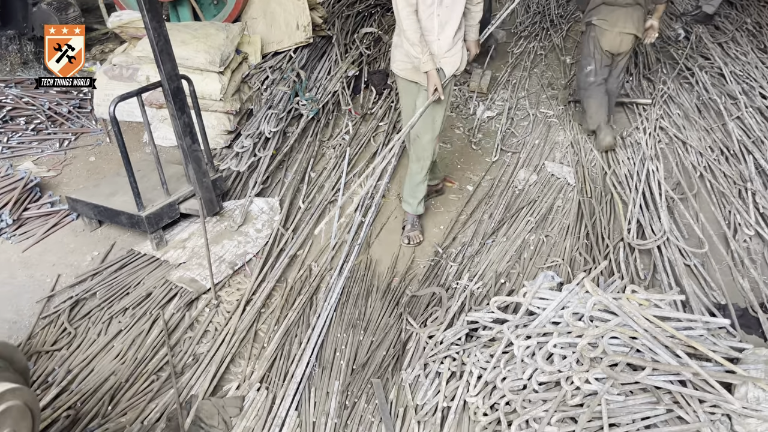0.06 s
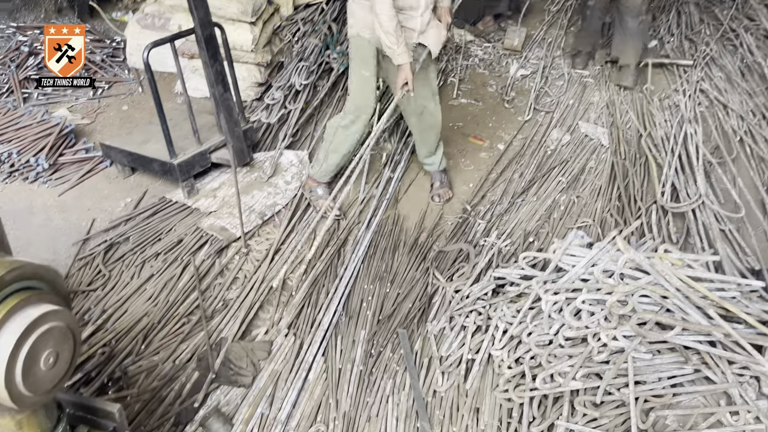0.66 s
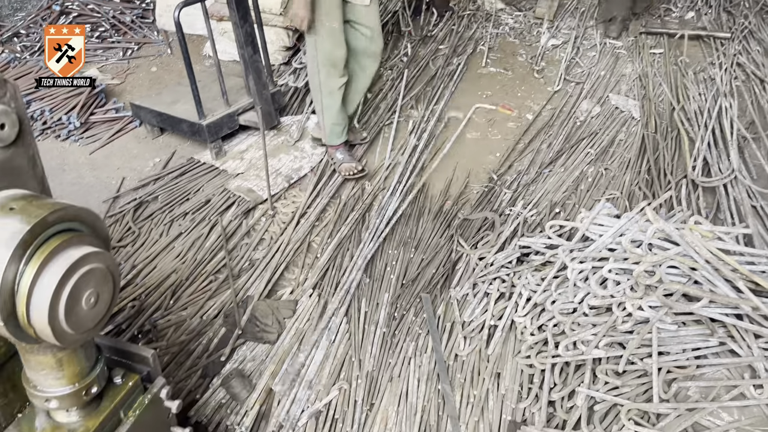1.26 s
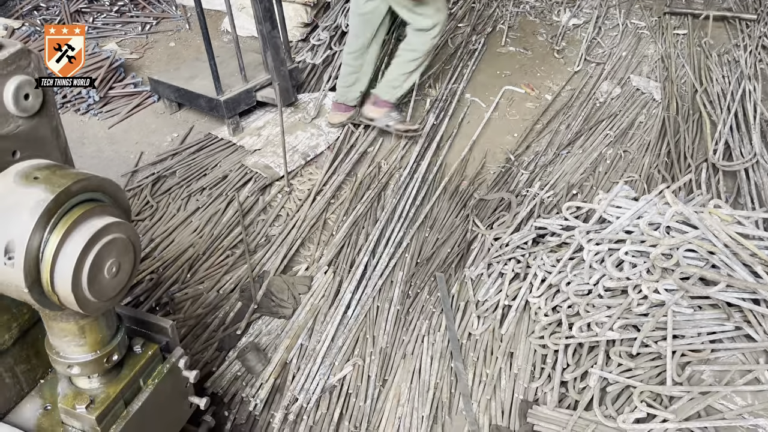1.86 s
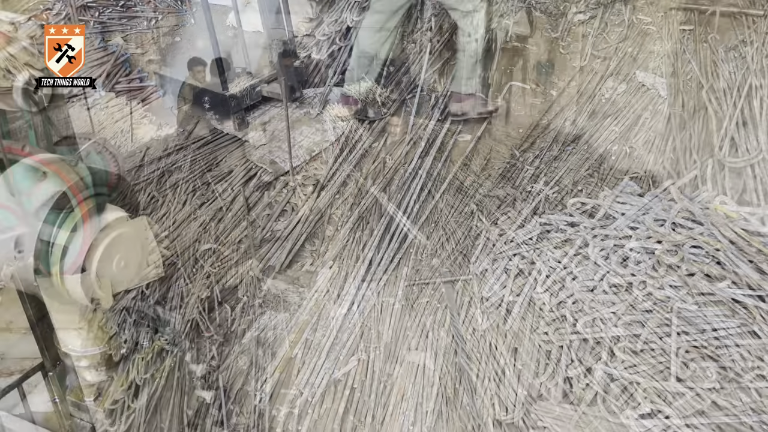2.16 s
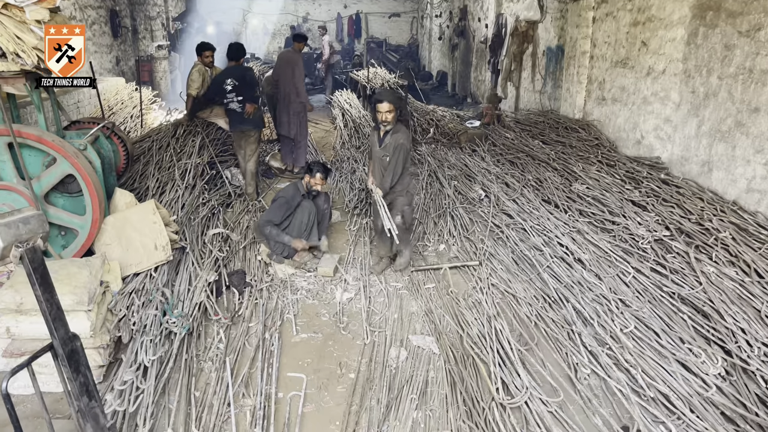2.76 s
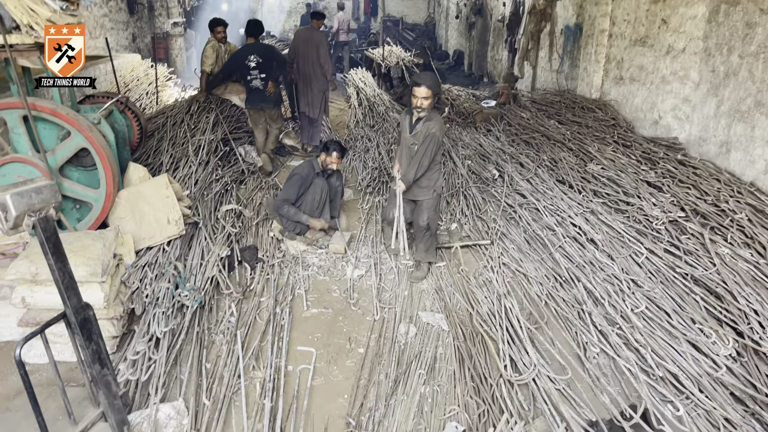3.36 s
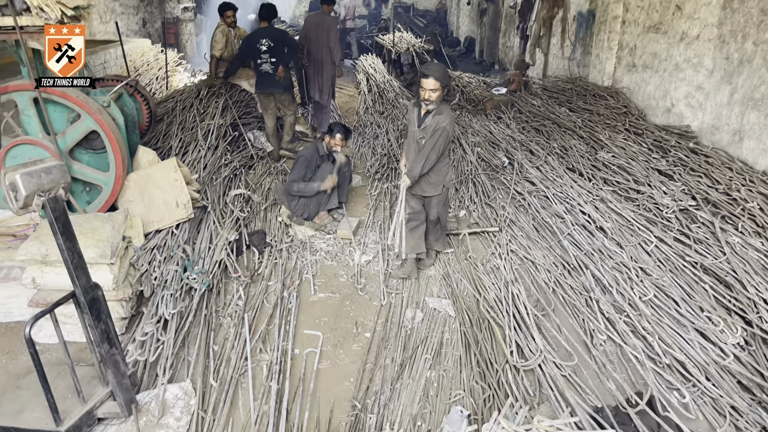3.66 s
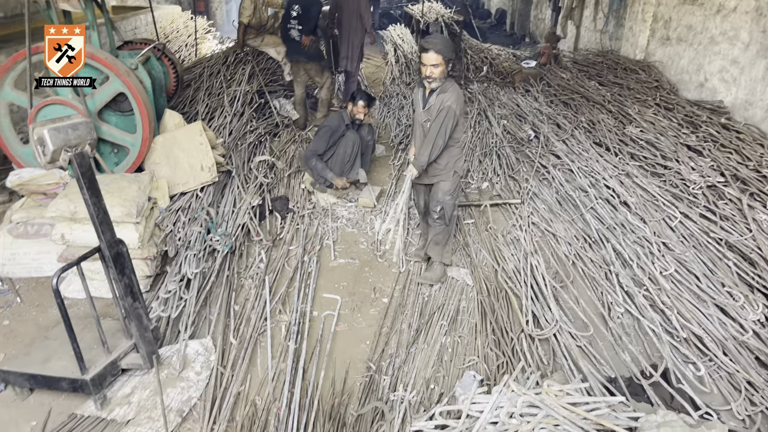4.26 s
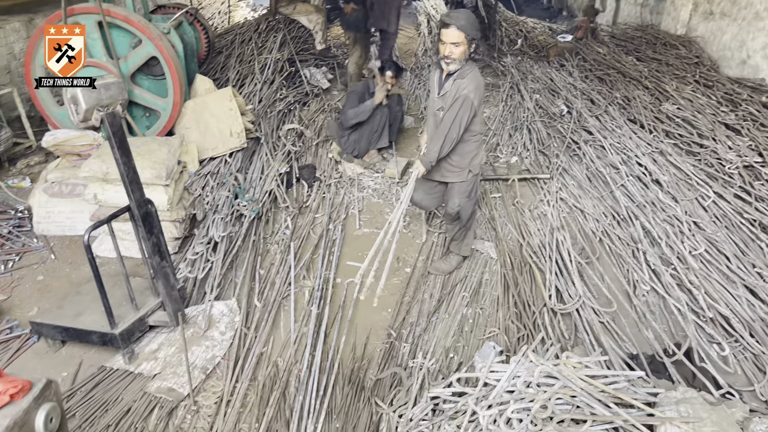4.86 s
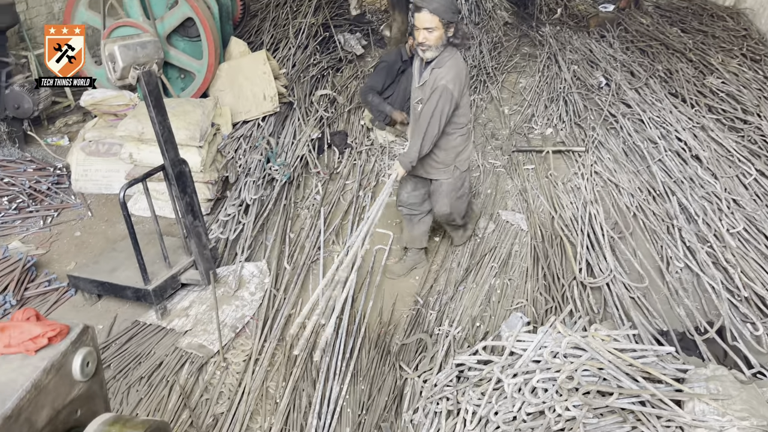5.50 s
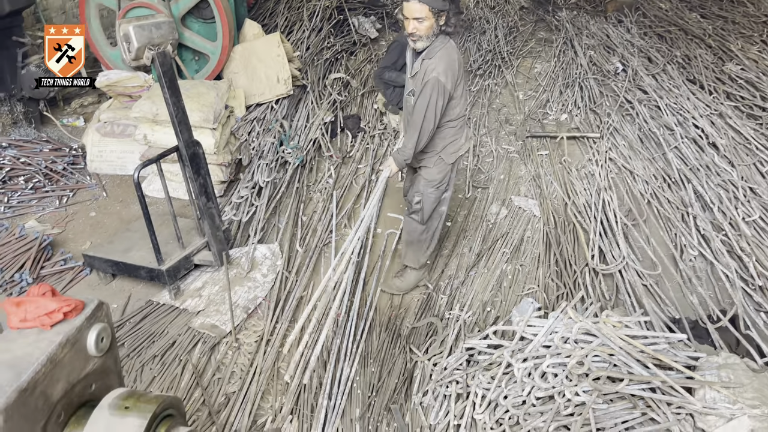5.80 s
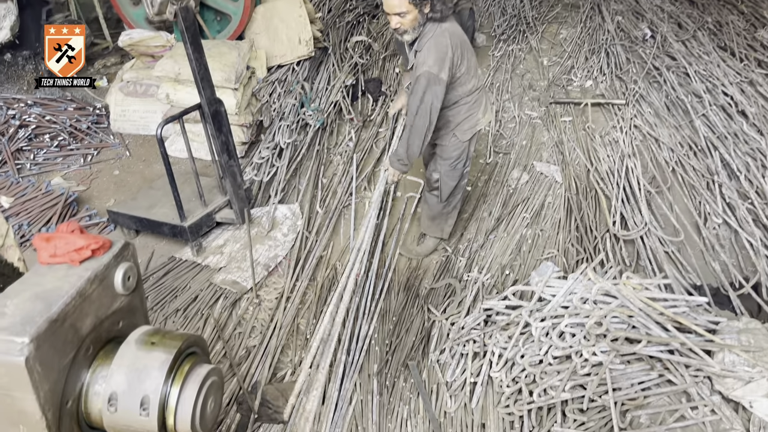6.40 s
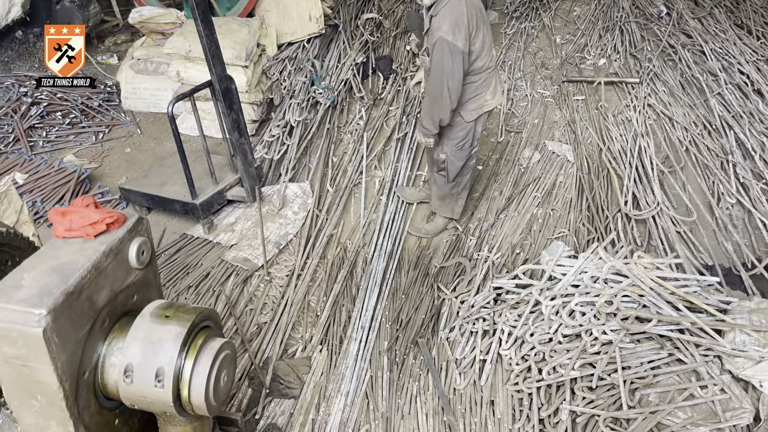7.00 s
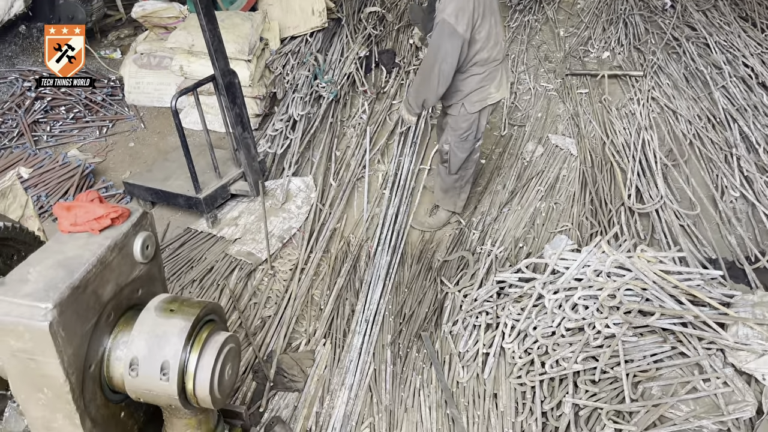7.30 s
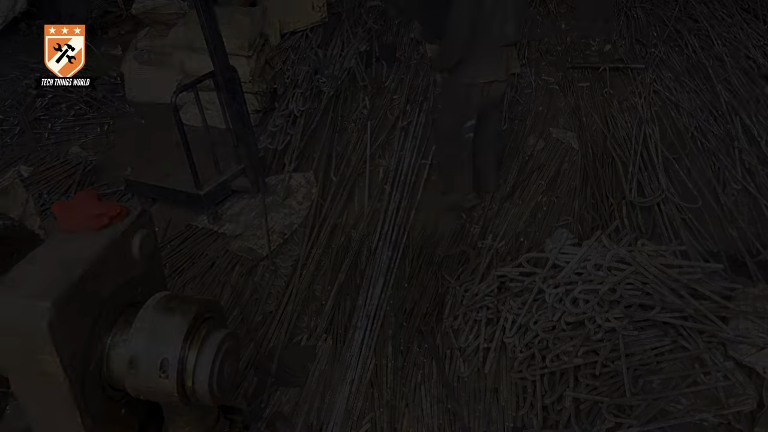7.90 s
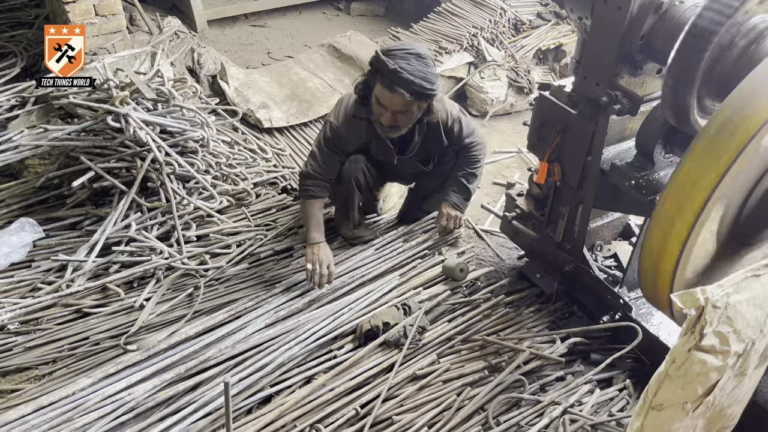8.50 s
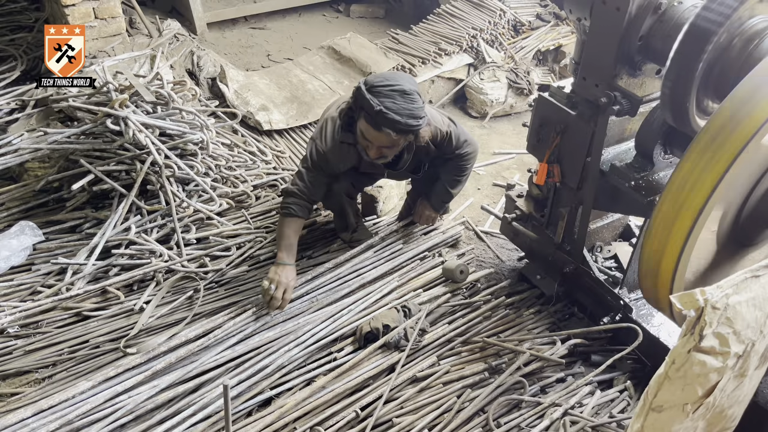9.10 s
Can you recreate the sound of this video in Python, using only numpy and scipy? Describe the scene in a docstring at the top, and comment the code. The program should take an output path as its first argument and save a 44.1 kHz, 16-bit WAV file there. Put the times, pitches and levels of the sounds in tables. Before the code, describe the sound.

Ribbed steel rods are dragged over a heap of bars, fairly close, in a hard-walled workshop with short reverberation. Each pull swells into dense metallic chatter and a bright rasp, then slides to rest. After an opening scrape, pulls peak at about 1, 1.9, 2.5, 3.7, 4.7, 5.7, 6.6 and 7.7 seconds, kicking loose bars into brief ringing clanks. Bars knock down on the pile throughout, and irregular footfalls add dull, hollow thumps. Bar ends clink brightly around 0.4, 1.3, 4.2, 5.3 and 6.1 seconds. Skidding tips give thin hisses, the clearest at 6.7 seconds. The sound cuts out for a tiny instant at 2.2 and 8 seconds. From 8 seconds a shorter, more resonant bundle is handled with quick knocks and clinks, ending in a loud clatter near 9 seconds. A quiet machine rumble and wavering low hum continue behind everything.

```python
"""Ribbed steel rods chatter and scrape as they are hauled hand over hand out of a workshop heap,
about one pull a second, kicking loose bars into clanks. A machine hums further back.
Bars knock down on the heap, their ends clink, feet make the pile ring hollow and tips skid with a hiss.
A shorter, more resonant bundle is handled last. Hard walls add a short reverberation;
twice the sound drops out for an instant."""
import sys
import numpy as np
from scipy import signal
from scipy.fft import rfft, irfft, next_fast_len
from scipy.io import wavfile

SR = 44100
rng = np.random.default_rng(int(sys.argv[2]) if len(sys.argv) > 2 else 0)


def store_wav(level_fs):
    """Save 16-bit WAV to argv[1]."""
    pcm = np.round(np.clip(np.atleast_2d(level_fs), -1, 1) * 32767)
    wavfile.write(sys.argv[1], SR, pcm.T.astype(np.int16))


N = 407925
T = np.arange(N) / SR


def undb(db):
    """Decibels to gain."""
    return 10 ** (np.asarray(db) / 20)


def unit(x):
    """Scale to rms 1."""
    return x / np.sqrt(np.mean(x ** 2))


def strike(x):
    """Scale a blow so that its first 20 ms have rms 1."""
    return x / np.sqrt(np.mean(x[:SR // 50] ** 2))


def unit_energy(x):
    """Scale a response so that it passes the power of white noise unchanged."""
    return x / np.sqrt(np.sum(x ** 2))


def onset(rise_s):
    """Attack envelope: contact builds up over a moment as more bars touch."""
    return 1 - np.exp(-T[:SR] / rise_s)


def fade(t60):
    """One second of exponential decay, falling 60 dB in t60 seconds."""
    return np.exp(-np.log(1000) * T[:SR] / t60)


def burst(t60):
    """Decaying noise: modes too dense to tell apart."""
    return rng.standard_normal(SR) * fade(t60)


def ring(hz, t60):
    """One decaying mode with a random phase."""
    return np.sin(2 * np.pi * (hz * T[:SR] + rng.random())) * fade(t60)


def colour(x, curve):
    """Equalise by a curve of (freq_hz, gain_db) points."""
    hz, db = np.transpose(curve)
    size = next_fast_len(x.shape[-1] + 4096, real=True)
    bins_hz = np.maximum(np.arange(size // 2 + 1) * SR / size, 1)
    gain = undb(np.interp(np.log(bins_hz), np.log(hz), db))
    return irfft(rfft(x, size) * gain, size)[..., :x.shape[-1]]


def tint(x, curve):
    """Colour a sound and keep its power."""
    return unit(colour(x, curve)) * np.sqrt(np.mean(x ** 2))


def drift(per_s):
    """Random modulation gliding between values of spread 1."""
    return np.interp(T * per_s, np.arange(4096), rng.standard_normal(4096))


def add(track, start_s, sound):
    """Mix a sound in at start_s."""
    start = max(int(start_s * SR), 0)
    track[start:start + len(sound)] += sound[:N - start]


def pull(grip_s, full_s, tug_s, hold_s, run_out_s, tug_db, gather_db_per_s):
    """Envelope of one pull: the bars gather speed, surge in a tug, hold and slide to rest."""
    slip_s, stop_s = 0.061, 0.065  # how fast the bars start sliding, and a tug dies as the arm stops
    before = np.minimum(T - full_s, 0)
    after = np.maximum(T - full_s - hold_s, 0)
    slide_db = gather_db_per_s * before - 60 * after / run_out_s
    surge_db = tug_db * (np.exp(-(before / tug_s) ** 2 - (after / stop_s) ** 2) - 1)
    return undb(slide_db + surge_db) * np.clip((T - grip_s) / slip_s, 0, 1)


# Pulls on the rods: grip_s, full_speed_at_s, tug_s, hold_s, chatter_db, scrape_db, scrape_t60_s
ROD_PULLS = [(-0.2, 0.0, 0.09, 0.0085, -24, -28, 0.96), (0.506, 0.967, 0.11, 0.048, -22, -24.5, 1.5),
             (1.4, 1.933, 0.16, 0.08, -21.5, -23.5, 1.0), (2.314, 2.523, 0.07, 0.034, -18.5, -22, 0.65),
             (3.29, 3.679, 0.088, 0.021, -20, -22.5, 0.9), (4.365, 4.66, 0.055, 0.026, -18.5, -20, 0.69),
             (5.247, 5.664, 0.18, 0.089, -21, -24, 1.14), (6.286, 6.586, 0.097, 0.043, -22, -24.5, .88),
             (7.537, 7.69, 0.059, 0.053, -20, -23, 0.8), (8.012, 8.2, 0.13, 0.02, -28, -36.5, 12),
             (8.436, 8.59, 0.17, 0.12, -29, -39, 0.5), (8.766, 8.94, 0.099, 0.025, -18, -23, 0.85)]
def hauling(chatter_stretch):
    """Envelopes of bouncing and rasping over all pulls; the bouncing dies away more slowly."""
    bounce = rasp = 1e-5
    for *timing, chatter_db, scrape_db, t60 in ROD_PULLS:
        bouncing = pull(*timing, t60 * chatter_stretch, tug_db=7.5, gather_db_per_s=33)
        rasping = pull(*timing, t60, tug_db=6.5, gather_db_per_s=41.5)
        bounce = np.hypot(bounce, undb(chatter_db) * bouncing)
        rasp = np.hypot(rasp, undb(scrape_db) * rasping)
    return bounce, rasp


def long_bar(t60, ring_db, clack_t60):
    """A bar in the heap: a damped clack and bending modes rising with the square of their number."""
    hz = rng.uniform(5, 10) * (np.arange(4, 46) + .5) ** 2
    strengths = hz ** .25 * rng.standard_normal(len(hz))
    spectrum = np.zeros(SR // 2 + 1, complex)
    spectrum[hz.astype(int)] = strengths * np.exp(2j * np.pi * rng.random(len(hz)))
    ringing = undb(ring_db) * unit_energy(irfft(spectrum) * fade(t60))
    clack = unit_energy(burst(clack_t60))
    return unit_energy((clack + ringing)[:SR // 5])


def rubbing(gain, curve, peak_per_s, scatter_db, jerk_db, ring_db, t60, clack_t60, rods):
    """Ribs catch and slip in jerky streams of tiny blows, denser as the gain rises."""
    out = np.zeros(N)
    speed = np.sqrt(gain / gain.max())
    heap = [long_bar(t60, ring_db, clack_t60) for _ in range(24)]
    span = int(0.09 * SR)  # a dragged rod meets another bar of the heap every 90 ms
    for _ in range(rods):
        catches = rng.random(N) < peak_per_s * speed / SR
        sizes = undb(scatter_db * np.clip(rng.standard_normal(N), -2, 2)) * rng.choice([-1, 1], N)
        jerks = undb(jerk_db * drift(35))
        blows = gain * unit(catches * sizes * jerks / np.sqrt(speed))
        cuts = np.arange(rng.integers(1, span), N, span)
        for start, contact in zip(np.append(0, cuts), np.split(blows, cuts)):
            add(out, start / SR, signal.fftconvolve(contact, heap[rng.integers(len(heap))]))
    return tint(out, curve) / np.sqrt(rods)


# Tone of the mid-heavy chatter and of the bright scrape: freq_hz, gain_db
CHATTER_EQ = [(50, -42), (140, -5), (215, -3), (270, 0.5), (400, -6.5), (560, -1), (900, -5), (1600, -2.5),
              (2300, -4.5), (3100, -6.5), (4200, -15), (7000, -14.5), (14000, -58)]
SCRAPE_EQ = [(800, -7.5), (2000, 0), (3300, 1.5), (4600, -0.5), (6200, 0.5), (7200, -0.5), (8500, 3.5),
             (9500, -1.5), (12000, -5), (15500, -12.5)]
def drag(bounce, rasp):
    """The rods bounce over the heap (chatter) while their ribs rasp on each other (scrape)."""
    chatter = rubbing(bounce, CHATTER_EQ, peak_per_s=460, scatter_db=4, jerk_db=1,
                      ring_db=-0.5, t60=0.053, clack_t60=0.019, rods=5)
    scrape = rubbing(rasp, SCRAPE_EQ, peak_per_s=1500, scatter_db=6, jerk_db=3,
                     ring_db=-10.5, t60=0.12, clack_t60=0.024, rods=4)
    return chatter + scrape


def loose_clanks(bounce, level_db, scatter_db, t60, count=1800):
    """Loose bars are kicked as the pull passes over them; each rings briefly at its own pitch."""
    low_hz, high_hz = 330.2, 3493
    out, t = np.zeros(N), T[:SR // 6]
    envelope = (fade(t60) * onset(0.0016))[:len(t)]
    for when, pitch, size in rng.random((count, 3)):
        hz = low_hz * (high_hz / low_hz) ** pitch
        add(out, when * T[-1], undb(scatter_db * size) * np.sin(2 * np.pi * hz * t) * envelope)
    return undb(level_db) * unit(out) * bounce


# Tone of the workshop's background rumble: freq_hz, gain_db
RUMBLE_EQ = [(25, -9), (60, 11), (130, 5), (280, 8.5), (500, 5.5), (900, -1), (2000, -4), (4000, -14),
             (9000, -20.5), (14000, -50)]
def machinery(rumble_db, hum_hz, hum_db):
    """Machinery further back: a steady rumble and a wavering hum, returned separately."""
    rumble = unit(colour(rng.standard_normal(N), RUMBLE_EQ)) * undb(0.11 * drift(12))
    phase = 2 * np.pi * np.cumsum(hum_hz + 1.64 * drift(13)) / SR
    hum = np.sin(phase) * undb(2.5 * drift(9) + 2 * drift(2))
    return undb(rumble_db) * rumble, undb(hum_db) * unit(hum)


# Tone of a knock's body: freq_hz, gain_db
THUD_EQ = [(70, -34), (180, 1), (350, 5), (600, 10), (1000, 4.5), (1400, 5), (1850, 4), (2400, 1),
           (3200, -2), (5000, -12.5), (12000, -37)]
# Bars dropping on the heap: start_s, body_db, bright_edge_db, t60_s
BAR_DROPS = [(0.172, -31, -31, 0.52), (0.413, -46, -36.5, .16), (0.607, -36, -41.5, 0.16),
             (0.73, -35.5, -35.5, 0.16), (0.755, -27, -32, 0.37), (0.814, -22.5, -30, 1),
             (0.924, -31, -19.5, 0.19), (1.008, -18.5, -25.5, 0.34), (1.055, -22, -28, 0.1),
             (1.29, -33, -24.5, 0.61), (1.461, -29, -33.5, 0.33), (1.559, -30.5, -31, 0.21),
             (1.682, -33, -28.5, 0.26), (1.756, -36, -23.5, 0.31), (1.865, -30, -28, 0.23),
             (1.918, -22.5, -20.5, 0.35), (2.238, -31.5, -52, 0.17), (2.275, -27, -37, 0.33),
             (2.396, -31, -27.5, 0.97), (3.208, -52, -45, 0.15), (3.242, -29.5, -39.5, 0.18),
             (3.298, -42, -27, 0.17), (3.359, -28, -31, 0.26), (3.507, -25, -44, 0.066),
             (3.645, -20, -25, 0.52), (3.694, -26, -21.5, 0.15), (3.706, -26, -28, .1),
             (4.077, -37, -55, 0.076), (4.342, -33, -49, 0.22), (4.409, -28.5, -32.5, 0.17),
             (4.461, -28.5, -27.5, 0.45), (4.817, -28, -33, 0.62), (5.132, -30.5, -46, 0.26),
             (5.231, -33, -45, 0.37), (5.603, -26.5, -45, 0.61), (5.791, -27, -28.5, 0.29),
             (6.336, -39, -37, 0.17), (6.401, -41, -31.5, 0.22), (6.47, -31.5, -26, 0.42),
             (6.565, -19.5, -23, 0.4), (7.202, -36.5, -48, 0.33), (7.321, -33.5, -35, 0.35),
             (7.435, -36, -46, 0.22), (7.594, -41, -25, 0.26), (7.683, -16.5, -20.5, 0.32),
             (7.95, -31, -37.5, .3), (8.015, -20.5, -22.5, 0.3), (8.097, -33, -29, 0.13),
             (8.152, -26, -25, 0.14), (8.309, -24.5, -32.5, 0.32), (8.446, -21.5, -27.5, 0.19),
             (8.529, -21.5, -32, 0.18), (8.557, -32, -26, 0.39), (8.638, -33, -27, 0.11),
             (8.806, -29, -25, 0.22), (8.898, -28, -25, 0.24), (8.928, -16, -16, 0.3)]
def knocks(crack_db, crack_t60, rise_s, uneven_db):
    """A bar lands with a crack and rattles its neighbours; each spot has its own resonances."""
    body, edge = np.zeros((2, N))
    hz = np.geomspace(200, 10000, 110)
    for start_s, body_db, edge_db, t60 in BAR_DROPS:
        envelope = np.hypot(fade(t60), undb(crack_db) * fade(crack_t60)) * onset(rise_s)
        spot_eq = np.column_stack([hz, uneven_db * rng.uniform(-1.15, 1, len(hz))])
        body_hit, edge_hit = colour(rng.standard_normal((2, SR)), spot_eq) * envelope
        add(body, start_s, undb(body_db) * strike(body_hit))
        add(edge, start_s, undb(edge_db) * strike(edge_hit))
    return tint(body, THUD_EQ) + tint(edge, SCRAPE_EQ)


def rebounds(sound, gap_s, drop_db, count=3):
    """A bar bounces a few times after a blow, at uneven gaps, dying away."""
    bounces, delay_s = np.zeros(N), 0
    for k, (gap, size) in enumerate(rng.uniform(.4, 1.6, (count, 2))):
        delay_s += gap * gap_s
        add(bounces, delay_s, size * undb(drop_db * (k + 2)) * sound)
    return sound + bounces[:len(sound)]


# Bending modes of a struck bar: pitch_hz, level_db, t60_s
BAR_MODES = [(3310, -5, 0.78), (3890, -12, 0.69), (4100, -11, 0.55), (4940, -5, .45), (5265, -0.5, 0.47),
             (5700, -5, .35), (6100, -2, .22), (6400, 2, 0.27), (6380, -2, .33), (6760, 3, 0.38),
             (6880, 0, .2), (7550, -3, 0.38), (7900, 3, 0.46), (8135, -1.5, 0.36), (8500, 7, 0.28),
             (9240, -0.5, 0.4)]
# Bar ends meeting: start_s, level_db, tilt_db_per_octave, favoured_hz, favoured_db, favoured_t60_s
END_HITS = [(0.411, -32, 2, 8156, -32, .8), (0.428, -33.5, 6, 8350, -28, .1),
            (1.279, -31, 8.5, 7700, -41, 0.3), (1.322, -29.5, 5, 8570, -34, .25),
            (3.452, -30.5, 2, 8000, -48.5, .3), (4.213, -34, -1, 6050, -32, 0.15),
            (4.225, -29, 3, 6110, -25, 0.098), (4.237, -33.5, 13, 7870, -21.5, 0.22),
            (4.246, -46, 0, 6880, -25, 0.13), (5.264, -31, 3, 7600, -31, 0.07),
            (5.276, -32, 0.5, 7330, -25, .22), (5.286, -32, 6, 6930, -24, 0.13),
            (6.074, -35, 2, 3316, -52, 1.3), (6.086, -39, 4, 8900, -40, 0.2),
            (6.094, -48, 5, 6417, -41, 0.25), (8.028, -34, 4, 5720, -17, 0.15),
            (8.034, -44, 6, 5850, -24, .09), (8.114, -39, 7, 5830, -32, 0.4),
            (8.235, -54, 6, 5580, -33, .25)]
def clinks(tick_db, tick_t60, rise_s, gap_s, drop_db):
    """Bar ends strike and bounce: a tick and high modes, one favoured by the point of contact."""
    tick_eq = [(1000, -2), (3500, -3), (6000, -0.5), (8300, 3), (12000, 4.5), (15500, -8)]
    out = np.zeros(N)
    for start_s, level_db, tilt, favoured_hz, favoured_db, favoured_t60 in END_HITS:
        modes = np.zeros(SR)
        for hz, mode_db, t60 in BAR_MODES:
            tilted_db = mode_db + tilt * np.log2(hz / favoured_hz)
            for detune in 0.00172 * rng.standard_normal(2):  # two bars, never quite alike
                modes += undb(tilted_db + 2.5 * rng.standard_normal()) * ring(hz * (1 + detune), t60)
        tick = strike(colour(burst(tick_t60), tick_eq))
        contact = strike(rebounds(modes, gap_s, drop_db)) + undb(tick_db) * tick
        favoured = undb(favoured_db) * ring(favoured_hz, favoured_t60)
        add(out, start_s, onset(rise_s) * (undb(level_db) * contact + favoured))
    return out


# Footfalls and bumps on the heap: start_s, level_db, pitch_hz, t60_s
FOOTFALLS = [(0.757, -26.5, 547, 0.21), (0.82, -25.5, 255, 0.35), (0.89, -23, 608, 0.26),
             (0.93, -24, 253.4, 0.35), (1.29, -30.5, 550, 0.24), (2.07, -25, 400, 0.13),
             (2.278, -34.5, 289, 0.32), (2.436, -24, 566, 0.18), (2.805, -28, 92.5, .2),
             (2.87, -33, 78, 0.27), (3.385, -34, 84, 0.12), (3.508, -31.5, 446, 0.6),
             (4.412, -26, 477, 0.29), (5.635, -24, 433.5, 0.52), (6.36, -37, 468, 0.36),
             (6.41, -35, 514, 0.33), (6.46, -38.5, 309, 0.48), (6.72, -35.5, 300, 0.44),
             (6.859, -41, 450, 0.19), (7.432, -29, 585, 0.15), (7.478, -32.5, 631, .25),
             (7.691, -29, 190, 0.23), (7.74, -29, 260, .25), (8.309, -33, 306, 0.33)]
def steps(detune, hollow_db, thump_db, rise_s):
    """Feet press on the heap: a dull thump and a narrow, hollow ring of the bars underneath."""
    out = np.zeros(N)
    for start_s, level_db, hz, t60 in FOOTFALLS:
        thump_eq = [(hz / 3, -25), (hz, 0), (hz * 2, -10), (hz * 10, -35), (hz * 24, -60)]
        thump = colour(burst(t60), thump_eq)
        hollow = sum(size * ring(hz * (1 + detune * rng.standard_normal()), t60) for size in (1, .5, .5))
        step = undb(hollow_db) * strike(hollow) + undb(thump_db) * strike(thump)
        add(out, start_s, undb(level_db) * step * onset(rise_s))
    return out


# Loose bars that ring out above the drag: start_s, lower_hz, upper_hz, level_db
CLANK_ACCENTS = [(0.925, 780, 3220, -16), (1.046, 1590, 1980, -21), (1.29, 2230, 4450, -27),
                 (1.683, 1570, 3380, -28), (1.757, 2020, 3440, -25.5), (1.929, 1870, 4900, -29),
                 (2.015, 830, 3010, -23), (2.277, 561, 1230, -20), (2.543, 988, 1710, -15.5),
                 (2.56, 1360, 4640, -27), (3.299, 2640, 3360, -28), (3.645, 820, 3830, -18.5),
                 (3.686, 1616, 2030, -14.5), (3.693, 1290, 3280, -22), (4.646, 1830, 2570, -20),
                 (4.818, 600, 2980, -23.5), (5.605, 1300, 3370, -15.5), (5.662, 1545, 3450, -15),
                 (5.7, 1810, 3100, -16), (6.564, 1450, 3810, -17), (6.62, 1600, 2270, -22),
                 (7.322, 2490, 3850, -30), (7.687, 1137, 1510, -21), (8.018, 1790, 2930, -23.5),
                 (8.151, 1726, 3460, -25), (8.31, 1710, 2620, -26), (8.447, 1890, 4580, -32),
                 (8.531, 1030, 2860, -18), (8.638, 1890, 2760, -21.5), (8.806, 996, 3230, -19.5),
                 (8.87, 1120, 1910, -18), (8.931, 1139, 2630, -14)]
def loud_clanks(upper_db, neighbour_db, detune, t60):
    """A hard-hit loose bar rings in two bending modes, each beating with a close neighbour."""
    out = np.zeros(N)
    for start_s, lower_hz, upper_hz, level_db in CLANK_ACCENTS:
        for hz, mode_db in ((lower_hz, level_db), (upper_hz, level_db + upper_db)):
            mode = ring(hz, t60)
            neighbour = undb(neighbour_db) * ring(hz * (1 + detune * rng.choice([-1, 1])), t60)
            add(out, start_s, undb(mode_db) * (mode + neighbour) * onset(0.0038))
    return out


# Tone of a skid's thin hiss: freq_hz, gain_db
SKID_EQ = [(1500, -10), (4000, -5), (6500, -3), (8500, -0.5), (12000, -7.5), (15500, -10)]
# Bar tips skidding: peak_s, half_length_s, level_db
TIP_SKIDS = [(1.022, 0.025, -33), (2.558, 0.021, -27.5), (2.86, 0.033, -42), (4.612, 0.0066, -36),
             (5.553, 0.037, -36), (6.695, 0.039, -19), (6.853, 0.065, -31), (7.517, 0.013, -38.5)]
def skids():
    """A bar tip slides along its neighbours: a fluttering hiss that swells and fades."""
    swells = sum(undb(level_db) / np.cosh(np.clip((T - peak_s) / half_s, -20, 20))
                 for peak_s, half_s, level_db in TIP_SKIDS)
    return rubbing(swells, SKID_EQ, peak_per_s=4500, scatter_db=4, jerk_db=-0.5,
                   ring_db=-12, t60=0.09, clack_t60=0.051, rods=3)


# Instants of silence: centre_s
GAPS_S = [2.213, 8.012]
def dropouts(half_gap_s, ramp_s):
    """Gate that cuts the sound for an instant at each gap."""
    distance_s = np.abs(T[:, None] - GAPS_S).min(axis=1)
    return np.clip((distance_s - half_gap_s) / ramp_s, 0, 1)


# Resonances of the shorter bundle: freq_hz, gain_db
BUNDLE_EQ = [(250, -3), (480, -1.5), (680, -8), (850, -1), (1130, -1), (1400, -4.5), (1800, 1.5),
             (2250, -4.5), (3400, -1.5), (4100, -1), (4700, 1.5), (5300, -1.5), (8000, -1)]
def short_bundle(rods, start_s):
    """From start_s the rods take on the more resonant tone of a shorter bundle beside the machine."""
    return np.where(T < start_s, rods, colour(rods, BUNDLE_EQ))


# Tone of the stereo side signal, keeping bass and high treble near the centre: freq_hz, gain_db
SIDE_EQ = [(30, -8), (60, -15), (125, -10.5), (250, -4.5), (500, 0.5), (1000, 5), (2000, 4.5), (4000, 0.5),
           (6000, 1.5), (8500, -26), (14000, -16)]
def room(dry, wet_db, side_db, t60, early_t60):
    """Reflections from floor and walls, shifting as the contacts move over the heap."""
    tail_eq = [(100, -5.5), (500, -4.5), (3000, -4.5), (9000, -9.5)]
    tail = colour(unit_energy(burst(t60) * onset(0.0043)), tail_eq)
    mid = dry + undb(wet_db) * signal.oaconvolve(dry, tail)[:N]
    place = np.pi * drift(5)
    side = np.zeros(N)
    for share in (np.cos(place), np.sin(place)):  # crossfade two reflection patterns
        reflections = unit_energy((burst(early_t60) + 0.075 * burst(t60)) * onset(0.00059))
        side += undb(side_db) * signal.oaconvolve(dry * share, colour(reflections, SIDE_EQ))[:N]
    return np.array([mid + side, mid - side]) / np.sqrt(1 + undb(wet_db) ** 2)


def scene():
    """Rods, feet and rumble share the hall; the hum sits dry in the centre."""
    bounce, rasp = hauling(chatter_stretch=1.43)
    rods = drag(bounce, rasp)
    rods += loose_clanks(bounce, level_db=-6.5, scatter_db=5.5, t60=0.069)
    rods += loud_clanks(upper_db=-4.5, neighbour_db=-4.5, detune=0.036, t60=0.11)
    rods += skids()
    rods += knocks(crack_db=5.5, crack_t60=0.028, rise_s=0.002, uneven_db=4.5)
    rods += clinks(tick_db=3, tick_t60=0.28, rise_s=0.00078, gap_s=0.011, drop_db=-10)
    rods = short_bundle(rods, start_s=8.012)
    rumble, hum = machinery(rumble_db=-37.5, hum_hz=93.9, hum_db=-48.5)
    feet = steps(detune=0.0463, hollow_db=-4, thump_db=-5, rise_s=0.002)
    hall = room(rods + feet + rumble, wet_db=-6, side_db=-6, t60=0.81, early_t60=0.07)
    return (hall + hum) * dropouts(half_gap_s=0.003, ramp_s=0.001)


# Tone of the left port against the right: freq_hz, left_minus_right_db
LEFT_EQ = [(100, 1), (250, -1.5), (1000, 0.7), (2000, -1), (4000, 2.5), (8000, 1)]
# Overall tone, deep bass trimmed and high treble thinned by two narrow dips: freq_hz, gain_db
OUTPUT_EQ = [(20, -11), (55, 0), (9200, 1.5), (9700, -5), (10200, -22), (12000, -2.5), (13200, -42),
             (16000, -6)]
def record(dry):
    """The left port hears the sound one sample early and a little brighter; the top falls steeply."""
    left = colour(dry[0], LEFT_EQ)
    right = np.append(0, dry[1, :-1])
    lowpass = signal.ellip(8, .2, 70, 15800, fs=SR, output="sos")
    return signal.sosfilt(lowpass, colour(np.array([left, right]), OUTPUT_EQ))


dry = scene()
out = record(dry)
store_wav(out)
```